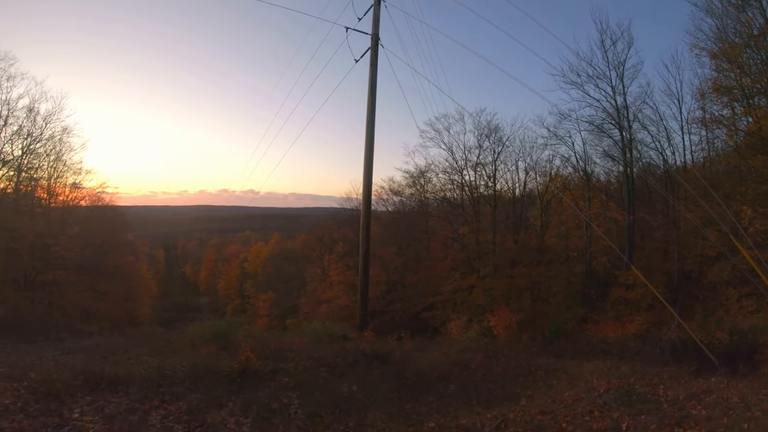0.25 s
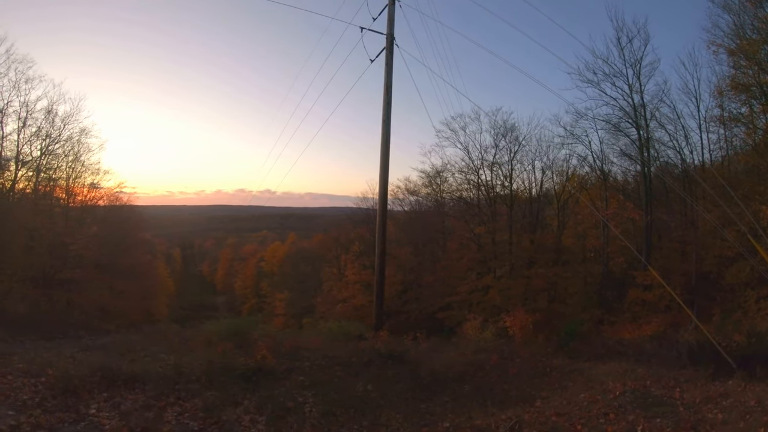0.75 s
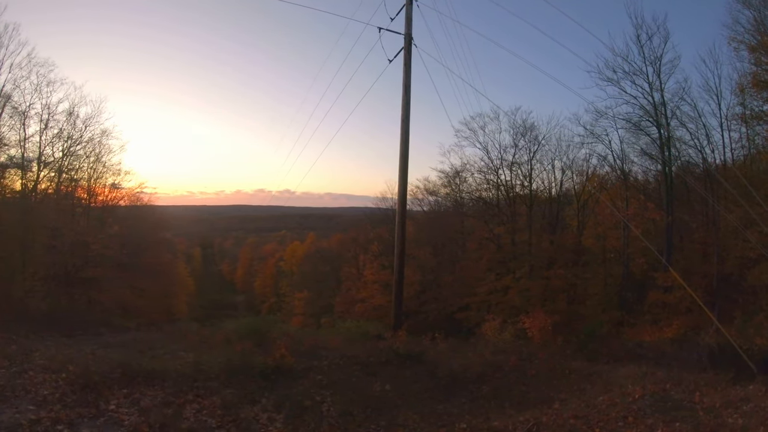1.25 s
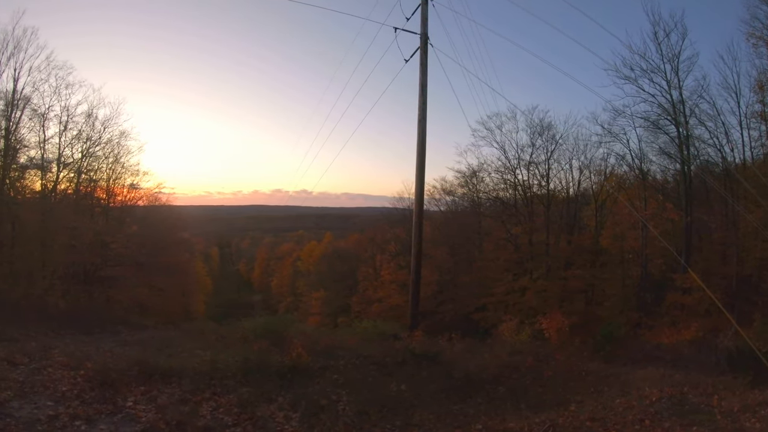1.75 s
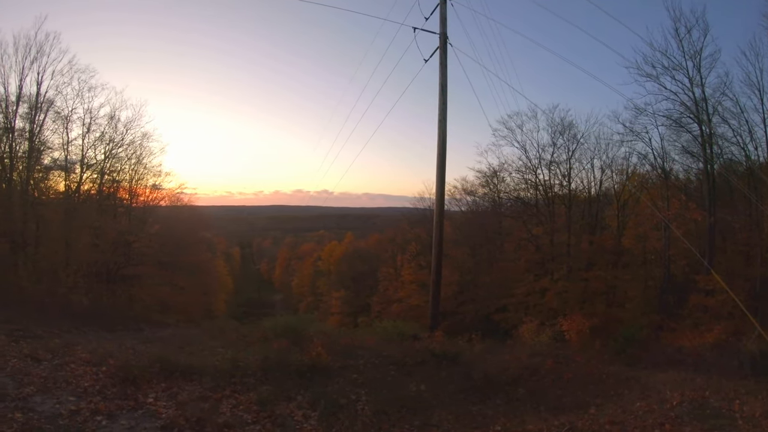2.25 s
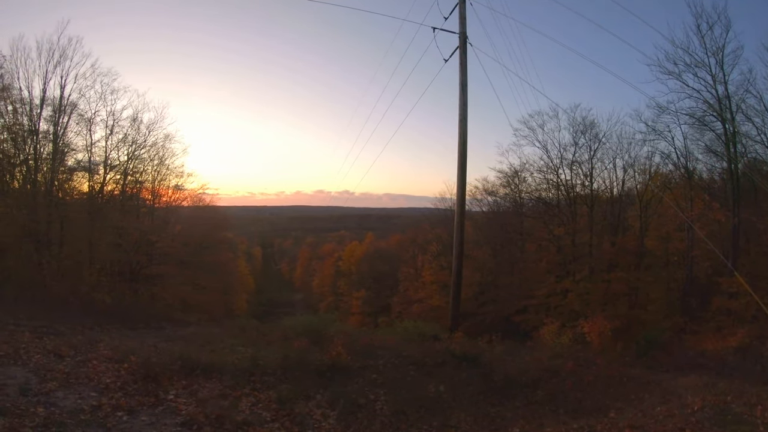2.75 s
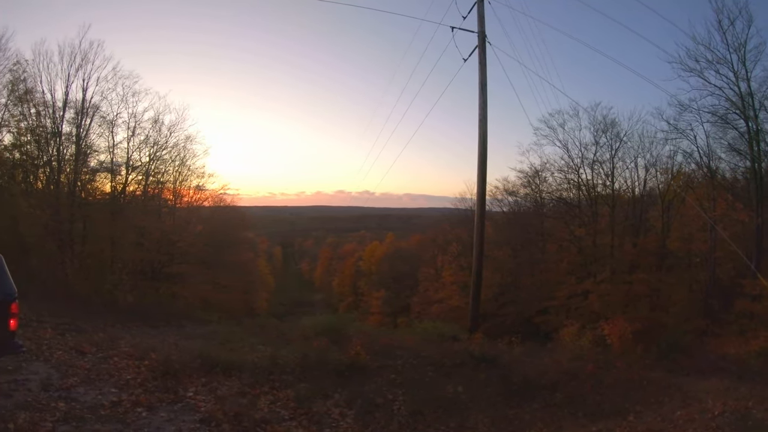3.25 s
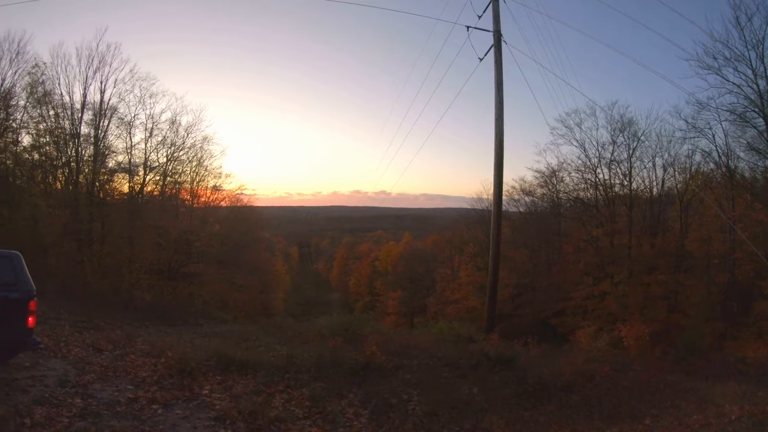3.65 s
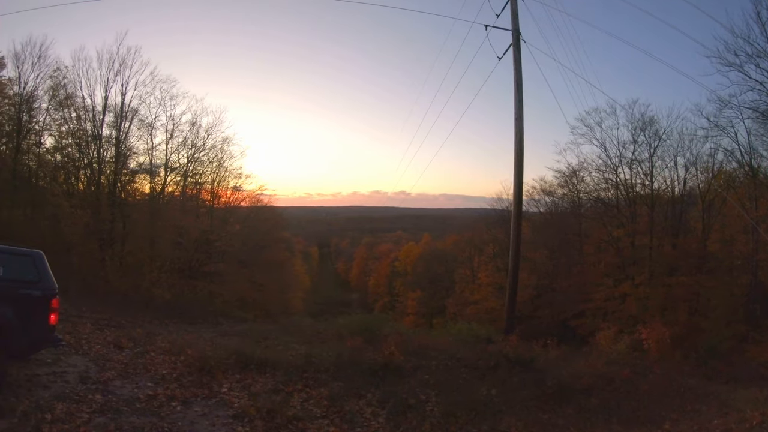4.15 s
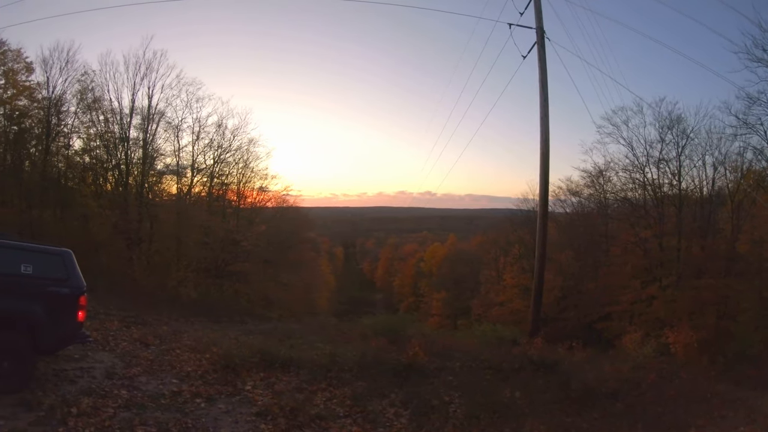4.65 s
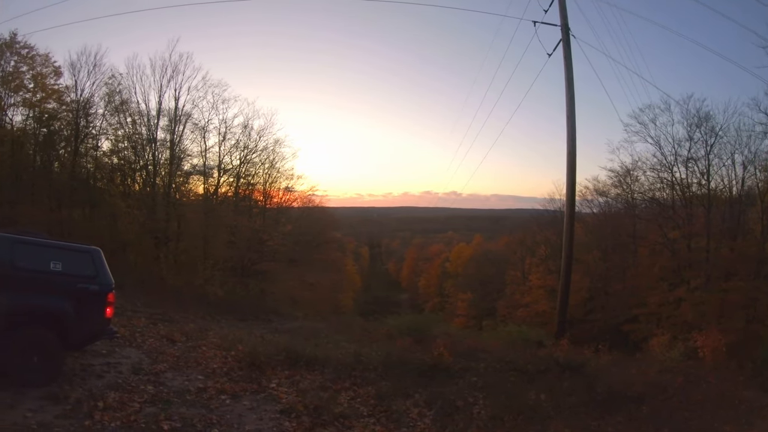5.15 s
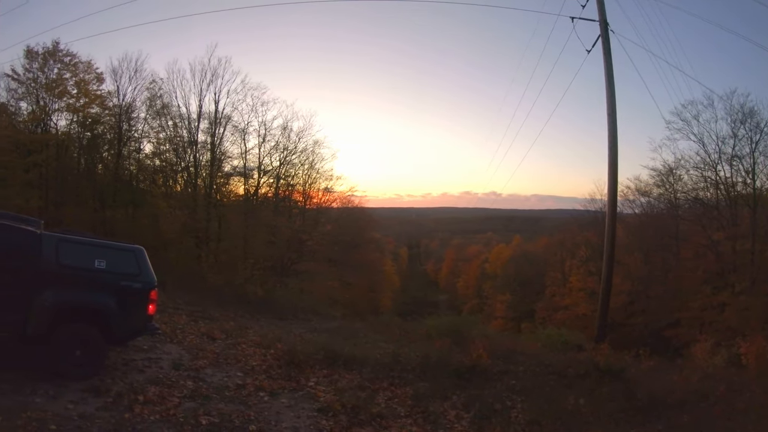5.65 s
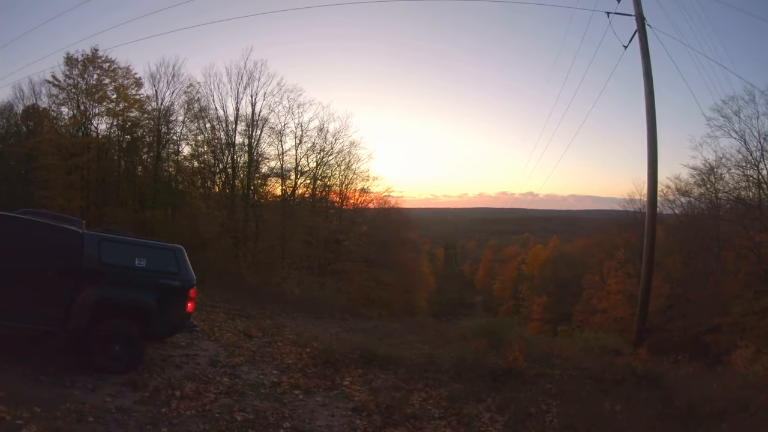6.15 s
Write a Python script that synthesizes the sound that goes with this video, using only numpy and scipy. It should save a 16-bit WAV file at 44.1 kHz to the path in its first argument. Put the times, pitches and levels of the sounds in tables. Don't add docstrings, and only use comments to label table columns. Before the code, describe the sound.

Outdoor idle of a parked truck, heard from a few metres away by an unsheltered microphone. The rumble is even but slightly lumpy, with a hollow mid-range roar and soft airy hiss. Small dry metallic knocks patter in clusters, thinning after four seconds. Deep wind buffets swell midway and again more lengthily near the end, as the engine keeps running.

```python
import sys
import numpy as np
from scipy import signal
from scipy.fft import rfft, irfft
from scipy.io import wavfile
from scipy.ndimage import uniform_filter1d

SR = 44100
rng = np.random.default_rng(int(sys.argv[2]) if len(sys.argv) > 2 else 0)


def magnitude_from_level(level_db):
    exponent = np.asarray(level_db, float) / 20
    return 10 ** exponent


def transcribe(u):
    v = np.clip(np.atleast_2d(u).T, -1, 1)
    q = np.round(v * 32767).astype(np.int16)
    wavfile.write(sys.argv[1], SR, q)


N = 282240

# t/s, exhaust puff rate/Hz, pump rotation rate/Hz
SHAFT_SPEEDS = [(0.0, 14.792, 17.409), (0.85, 15.194, 17.767), (1.31, 14.795, 17.333),
                (2.6, 15.119, 17.526), (3.51, 14.736, 17.224), (3.85, 15.075, 17.51),
                (4.23, 15.094, 17.425), (5.74, 14.992, 17.553), (6.4, 14.756, 17.629)]
# t/s, exhaust level/dB, pump level/dB
LOAD_CURVE = [(0, 1.5, -2.5), (.6, -1.5, 0.5), (1.2, -0.5, 0), (2.3, -1.5, 0), (2.53, -1.5, -1),
              (2.8, -1, -1), (3.5, -0.4, -2.5), (4.4, -0.5, 0), (4.95, -0.5, 0), (5.22, 3.5, -4.5),
              (5.4, -10.5, 4.5), (5.7, 0, 2), (5.95, 0.5, 0), (6.4, -2, 3.5)]
# multiple of the puff rate, rms level/dB
EXHAUST_ORDERS = [(2, -62), (3, -61), (4, -63), (5, -51.5), (6, -50.5), (7, -52.5), (8, -51.5), (9, -56),
                  (10, -53.5), (11, -68), (12, -65), (13, -60), (14, -69)]
CYLINDER_LEVELS = [0.4, 1.4, -2.2]
# multiple of the rotation rate, rms level/dB
PUMP_ORDERS = [(2, -67.5), (3, -73), (4, -77.5), (5, -59.5), (6, -70), (8, -71), (10, -68), (13, -52),
               (14, -54), (15, -74.5), (17, -70), (21, -75), (36, -74.5)]
# phase/turn, level/dB
VALVE_TAPS = [(0.237, -6.5), (0.32, -8), (0.404, -7.5), (.6, -6), (.66, -10)]
# f/Hz, bandwidth/Hz, level/dB
VALVE_RESONANCES = [(3708, 9, -4), (3768, 18, -1.5), (3812, 14, -5), (3856, 32, 1), (3925, 50, -5),
                    (4300, 900, -7)]
# t/s, level/dB
PANEL_LOOSENESS = [(0, -59), (.4, -62), (.45, -52.5), (.62, -51), (.68, -56), (1.05, -55.5), (1.26, -65),
                   (1.33, -63.5), (1.39, -54.5), (1.5, -58.5), (2.17, -63), (3.15, -52.5), (3.28, -59),
                   (3.37, -54.5), (3.75, -54), (3.97, -62.5), (4.03, -51), (4.1, -63.5), (5.7, -63),
                   (6.4, -60)]
# t/s, peak level/dB, f/Hz
PANEL_KNOCKS = [(0.174, -46, 1030), (0.315, -48, 1040), (0.434, -44, 1000), (0.464, -40, 1040),
                (0.508, -42, 1000), (0.558, -41, 1020), (0.671, -53, 972), (0.717, -46, 1020),
                (0.856, -50, 1080), (0.898, -44, 1000), (0.922, -49, 970), (0.958, -48, 1040),
                (1.022, -42.5, 1050), (1.089, -42, 985), (1.297, -42, 1020), (1.364, -42, 1060),
                (1.387, -40, 1080), (1.429, -47, 1040), (1.543, -47, 1010), (1.66, -42, 1030),
                (1.854, -55, 851), (1.972, -47, 942), (2.035, -47, 1030), (2.133, -50, 860),
                (2.253, -46, 1030), (2.292, -47, 1040), (2.368, -56, 999), (2.429, -42, 1060),
                (2.457, -55, 1060), (2.533, -46.5, 980), (2.555, -47, 1060), (2.604, -47, 1080),
                (2.744, -54, 1000), (2.782, -42, 1046), (2.834, -39, 1020), (2.857, -49, 1050),
                (2.873, -45, 990), (3.05, -40, 990), (3.097, -43, 1040), (3.136, -44, 1060),
                (3.155, -44, 974), (3.176, -35, 1000), (3.212, -49, 993), (3.227, -42, 1050),
                (3.352, -39.5, 1020), (3.38, -47, 1010), (3.398, -46, 970), (3.474, -42, 1070),
                (3.514, -41, 1040), (3.598, -53, 1010), (3.625, -49, 1040), (3.658, -43, 1060),
                (3.73, -48, 970), (3.771, -44, 1080), (3.838, -45, 1010), (3.894, -52, 856),
                (3.91, -49, 1020), (4.003, -46.5, 1020), (5.642, -46, 1080), (6.359, -50, 1080)]
# t/s, peak level/dB, f/Hz
BRACKET_TICKS = [
    (0.434, -51, 1030),
    (0.67, -48, 1040),
    (2.782, -49, 1080),
    (3.626, -47, 1040),
    (4.086, -44, 686),
    (5.312, -39, 797),
]
# f/Hz, spectral density level/dB
BAY_SPECTRUM = [(220, -25), (380, -10.5), (440, -1.5), (507, 2), (591, -2), (611, -1.5), (825, 0),
                (940, -5), (1020, -2), (1400, -20), (1820, -57.5), (3080, -120)]
# f/Hz, spectral density level/dB
HISS_SPECTRUM = [(900, -13), (1230, 0), (1340, -12.5), (1420, -3.5), (1490, -1), (1550, -2), (1890, -8.5),
                 (2480, -11.5), (2680, -14), (3470, -15.5), (3690, -14.5), (4000, -10.5), (4730, -10.5),
                 (5400, -18.5), (6800, -44)]
# f/Hz, bandwidth/Hz, rms level/dB
INTAKE_WHISTLES = [(1488, 30, -81), (1637, 20, -87), (1989, 20, -89), (2528, 14, -91)]
# t/s, peak level/dB, f/Hz
WIND_EDDIES = [(2.221, -31, 58.6), (2.456, -32, 139), (2.489, -31, 111), (2.546, -21, 81),
               (2.548, -26.5, 269), (2.563, -39.5, 395), (2.564, -29.5, 70), (2.576, -25.5, 87),
               (2.652, -32, 102), (2.672, -32.5, 179), (2.689, -40, 150), (2.721, -41, 142),
               (2.784, -31, 150), (2.822, -32, 211), (2.985, -21.5, 133), (5.351, -24.5, 133),
               (5.387, -31, 100), (5.411, -29, 245), (5.436, -36, 309), (5.438, -29, 120),
               (5.472, -27.5, 273), (5.474, -32, 105), (5.476, -39, 420), (5.507, -27, 91.5),
               (5.512, -27, 235), (5.535, -28, 257), (5.587, -26.5, 110.4), (5.629, -37, 186),
               (5.655, -28, 150), (5.716, -38, 173), (5.784, -33, 169), (5.81, -32, 185), (5.853, -36, 78),
               (5.853, -36.5, 187), (5.88, -31, 119), (5.92, -28, 110)]
# t/s, level/dB
BREEZE_STRENGTH = [(0, -4), (.43, 1), (1.2, -1), (1.65, -0.5), (2.1, 0.5), (2.55, 5.5), (2.75, 1.5),
                   (3.05, -2.5), (3.9, 1.5), (4.4, -1), (4.76, 3), (5.0, -1.5), (5.33, 3.5), (5.49, 6),
                   (5.58, 3), (5.72, -2), (5.87, 4), (6.05, 2.5), (6.4, 1.5)]
# f/Hz, spectral density level/dB
DEEP_SPECTRUM = [(5, -24), (12, -19), (25, -11.5), (40, -7), (62, -6.5), (76, -7), (86, -9), (110, -9.5),
                 (126, -12), (145, -9), (170, -9.5), (210, -13), (300, -21)]
# f/Hz, spectral density level/dB
UPPER_SPECTRUM = [(140, -12.5), (200, -4), (260, 1.6), (310, -2.5), (370, -10), (440, -19.5), (600, -52)]
# f/Hz, spectral density level/dB
AIR_SPECTRUM = [(4800, -12), (5300, -4), (6000, -2), (7000, -9.5), (8300, -9.5), (9200, -14.5), (9800, -22),
                (11400, -23), (11750, -22.5), (12000, -18.5), (13200, -18), (14600, -21), (15600, -29.5),
                (16200, -45.5)]
TREBLE_GAPS = [.045, .454, 1.392, 1.522, 1.99, 2.25, 2.33, 2.545, 2.574, 2.654, 2.998, 3.457, 4.654, 5.062,
               5.123, 5.193, 5.252, 5.362, 5.443, 5.517, 5.537, 5.595, 5.847, 6.191]


def exhaust(turns, strength_db):
    puffs = np.arange(int(turns[-1]) + 2)
    puff_db = np.array(CYLINDER_LEVELS)[puffs % len(CYLINDER_LEVELS)]
    puff_db = puff_db + 1.2 * rng.standard_normal(len(puffs))
    late_turns = 0.004 * rng.standard_normal(len(puffs))
    pipe_delay_turns = 0.014
    heard = turns - pipe_delay_turns - per_turn(late_turns, turns)

    odd = [row for row in EXHAUST_ORDERS if row[0] % 2]
    even = [row for row in EXHAUST_ORDERS if row[0] % 2 == 0]
    pipe = orders(heard, odd, skew=0)
    pipe += orders(heard, even, skew=-0.65)

    gate = np.exp(7.0 * (np.cos(2 * np.pi * (turns - 0.07)) - 1))
    gate += magnitude_from_level(-6.5) * np.exp(10.0 * (-np.cos(2 * np.pi * (turns + 0.015)) - 1))
    gas = rng.standard_normal(N)
    for _ in range(2):
        gas = resonance(gas, hz=116, width_hz=150)
    return magnitude_from_level(strength_db + per_turn(puff_db, turns)) * (pipe + magnitude_from_level(-56) * gate * rms_one(gas))


def pump(turns, strength_db):
    hum = orders(turns - 0.667, PUMP_ORDERS, skew=-1.84) * magnitude_from_level(strength_db + 0.9 * drift(5.1))
    taps = np.zeros(N)
    for share, db in VALVE_TAPS:
        at = np.flatnonzero(np.diff(np.floor(turns - share)))
        taps[at] = magnitude_from_level(db + 1.5 * rng.standard_normal(len(at)))

    energy = signal.lfilter([1], [1, -0.9988], taps)
    tones = sum(magnitude_from_level(db) * song(hz, width_hz / 2) for hz, width_hz, db in VALVE_RESONANCES[:4])
    sung = rms_one(np.sqrt(energy) * tones)

    scrapes = uniform_filter1d(taps, size=190) * rng.standard_normal(N)
    scrapes = resonance(scrapes, hz=3900, width_hz=900)
    rings = sum(magnitude_from_level(db) * rms_one(resonance(scrapes, hz, width_hz))
                for hz, width_hz, db in VALVE_RESONANCES)
    return hum + magnitude_from_level(-81) * rms_one(rings) + magnitude_from_level(-82) * sung


def panel(loose_db):
    sizes = magnitude_from_level(1.6 * np.minimum(rng.exponential(1, N), 3)) * rng.choice([-1, 1], N)
    contacts_per_s = 800
    touches = sizes * (rng.random(N) < contacts_per_s / SR) + 1e-18
    ring = resonance(touches, hz=978, width_hz=180) - resonance(touches, hz=1130, width_hz=265)
    ring = resonance(ring, hz=1040, width_hz=220)
    body = resonance(resonance(touches, hz=820, width_hz=480), hz=820, width_hz=480)
    rattle = rms_one(ring) + magnitude_from_level(-1.5) * rms_one(body)
    ticks = [(*tick, 0.82) for tick in BRACKET_TICKS]
    return magnitude_from_level(loose_db - 7.0) * rattle + bursts(knocks() + ticks, rise=0.11, trim_db=-2.3)


def knocks():
    rows = []
    for s, db, hz in PANEL_KNOCKS:
        longer_db = 0.35 * (db + 46) + rng.standard_normal()
        rows.append((s, db, hz, 3.84 * magnitude_from_level(longer_db)))
    return rows


def engine_bay(loose_db):
    level_db = -57 + 0.054 * (loose_db - loose_db.mean())
    return magnitude_from_level(level_db) * noise(BAY_SPECTRUM, flicker_db=0.57, rate=15)


def fan_hiss():
    return magnitude_from_level(-67.5) * noise(HISS_SPECTRUM, flicker_db=0.9, rate=29)


def whistles():
    flow = rng.standard_normal(N)
    total = np.zeros(N)
    for hz, width_hz, db in INTAKE_WHISTLES:
        tone = resonance(resonance(flow, hz, width_hz), hz, width_hz)
        total += magnitude_from_level(db) * rms_one(tone)
    return total


def buffets():
    rows = [(s, db, hz, 0.85 * (hz / 105) ** 0.75) for s, db, hz in WIND_EDDIES]
    return bursts(rows, rise=0.24, trim_db=-4)


def wind_rumble(gust_db):
    deep = magnitude_from_level(-45.5 + gust_db) * noise(DEEP_SPECTRUM, flicker_db=2.2, rate=11)
    upper = magnitude_from_level(-53 + 0.16 * gust_db) * noise(UPPER_SPECTRUM, flicker_db=1.3, rate=14)
    return deep + upper


def air():
    drop_db, drop_s, top_from_hz = -10, 0.022, 8800
    marks = np.zeros(N)
    marks[(np.array(TREBLE_GAPS) * SR).astype(int)] = drop_s * SR
    gone = uniform_filter1d(marks, size=int(drop_s * SR))
    gone = np.minimum(uniform_filter1d(gone, size=150), 1)
    whole = noise(AIR_SPECTRUM, flicker_db=1.0, rate=18)
    highpass = signal.butter(6, top_from_hz, "high", fs=SR, output="sos")
    top = signal.sosfiltfilt(highpass, whole)
    below = whole - top
    return magnitude_from_level(-83.5) * (magnitude_from_level(drop_db * gone) * top + magnitude_from_level(0.18 * drop_db * gone) * below)


def orders(turns, table, skew):
    return sum(np.sqrt(2) * magnitude_from_level(db) * np.cos(2 * np.pi * k * turns + skew) for k, db in table)


def per_turn(values, turns):
    return uniform_filter1d(np.interp(turns, np.arange(len(values)), values), size=800)


def bursts(events, rise, trim_db):
    out = np.zeros(N + SR)
    for s, db, hz, cycles in events:
        turn = np.arange(int(6 * cycles / hz * SR)) * hz / SR
        shape = (1 - np.exp(-turn / (rise * cycles))) ** 2 * np.exp(-turn / cycles)
        at = round(s * SR)
        out[at:at + len(turn)] -= magnitude_from_level(db + trim_db) * shape / shape.max() * np.sin(2 * np.pi * turn)
    return out[:N]


def resonance(x, hz, width_hz):
    r = np.exp(-np.pi * width_hz / SR)
    poles = [1, -2 * r * np.cos(2 * np.pi * hz / SR), r * r]
    return signal.lfilter([(1 - r * r) / 2, 0, (r * r - 1) / 2], poles, x)


def song(hz, width_hz):
    wander = np.sqrt(2 * np.pi * width_hz / SR) * np.cumsum(rng.standard_normal(N))
    return np.sqrt(2) * np.sin(2 * np.pi * hz * np.arange(N) / SR + wander)


def noise(spectrum, flicker_db, rate):
    points_hz, points_db = np.transpose(spectrum)
    log_hz = np.log(np.fft.rfftfreq(N, 1 / SR) + 1e-3)
    colour_db = np.interp(log_hz, np.log(points_hz), points_db, left=-99, right=-150)
    coloured = irfft(rfft(rng.standard_normal(N)) * magnitude_from_level(colour_db), N)
    return rms_one(coloured * magnitude_from_level(flicker_db * drift(rate)))


def drift(rate):
    knots = rng.standard_normal(400)
    return np.interp(np.arange(N) / SR * rate, np.arange(len(knots)), knots)


def in_time(rows):
    s, *columns = np.transpose(rows)
    return [np.interp(np.arange(N) / SR, s, c) for c in columns]


def rms_one(x):
    return x / np.sqrt(np.mean(x ** 2) + 1e-20)


def scene():
    puffs_per_s, turns_per_s = in_time(SHAFT_SPEEDS)
    puff_db, pump_db = in_time(LOAD_CURVE)
    (gust_db,) = in_time(BREEZE_STRENGTH)
    (loose_db,) = in_time(PANEL_LOOSENESS)
    puff_turns = 0.165 + np.cumsum(puffs_per_s) / SR
    pump_turns = 0.935 + np.cumsum(turns_per_s) / SR

    machines = exhaust(puff_turns, puff_db) + pump(pump_turns, pump_db) + panel(loose_db)
    flow = engine_bay(loose_db) + fan_hiss() + whistles()
    wind = buffets() + wind_rumble(gust_db)
    return (machines + flow + wind + air())[None]


def top_cut(x):
    return signal.sosfilt(signal.butter(12, 15750, fs=SR, output="sos"), x)


def record(dry):
    fade = np.minimum(np.arange(N) / (0.004 * SR), 1)
    mix = dry * np.sin(np.pi / 2 * fade) ** 2
    return top_cut(mix)


dry = scene()
out = record(dry)
transcribe(out)
```